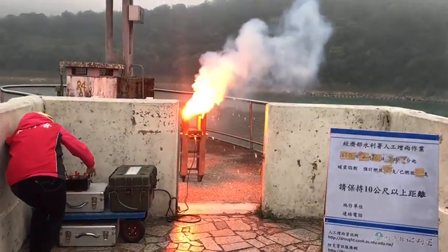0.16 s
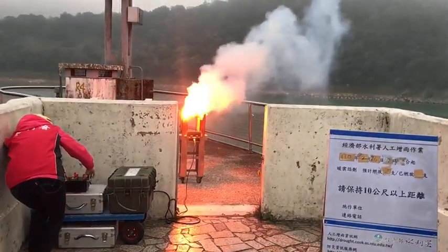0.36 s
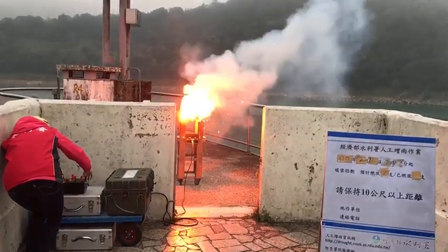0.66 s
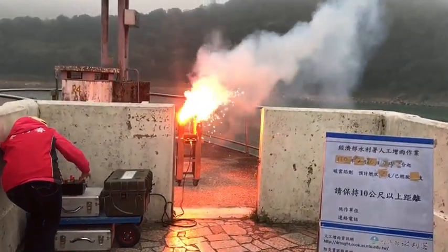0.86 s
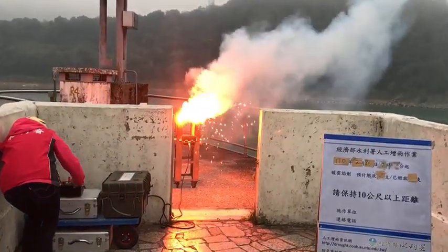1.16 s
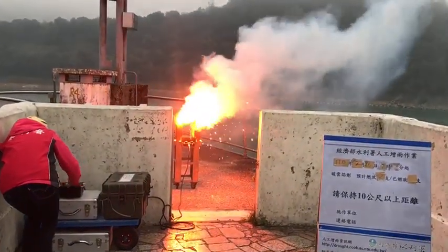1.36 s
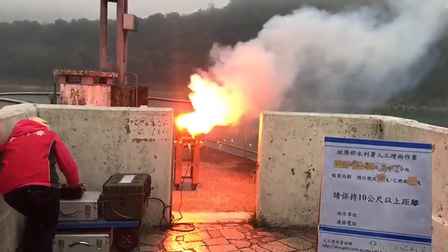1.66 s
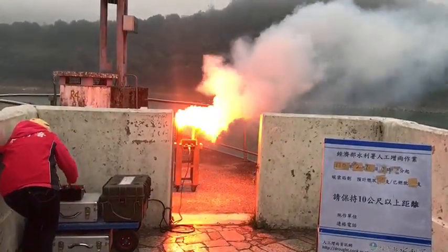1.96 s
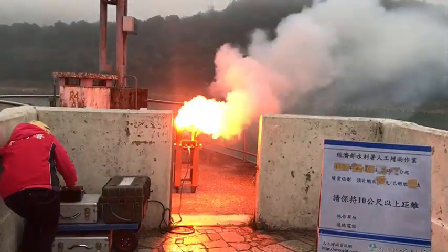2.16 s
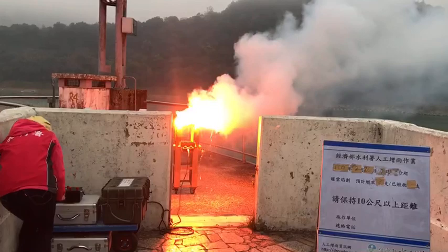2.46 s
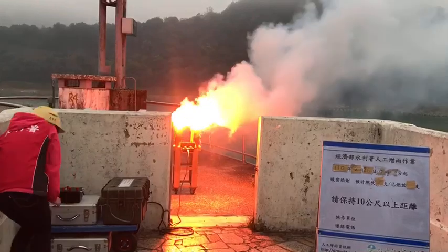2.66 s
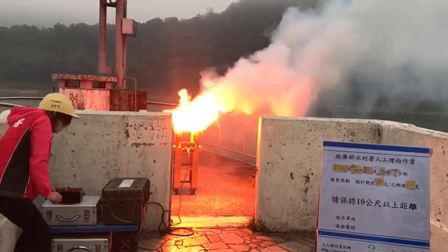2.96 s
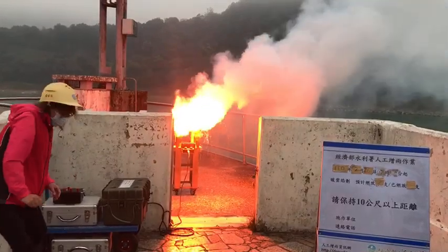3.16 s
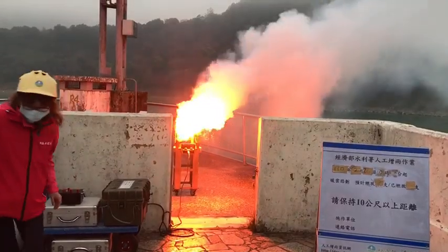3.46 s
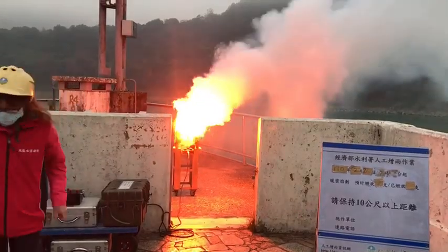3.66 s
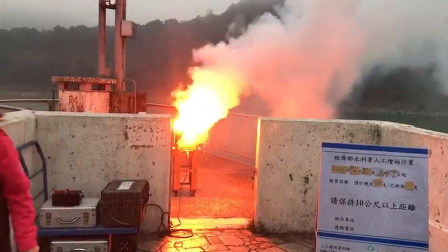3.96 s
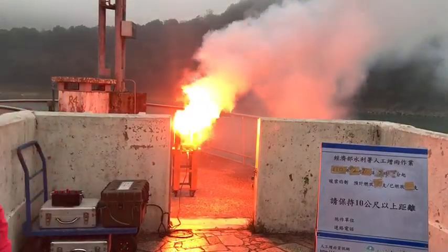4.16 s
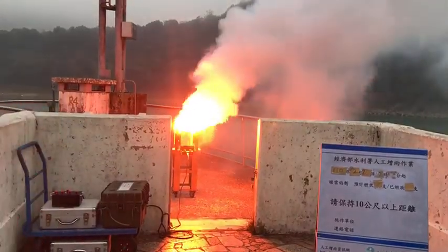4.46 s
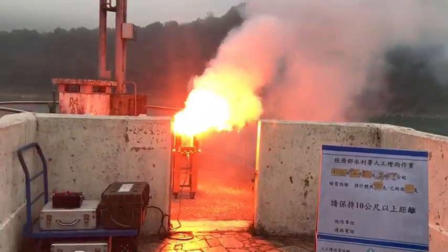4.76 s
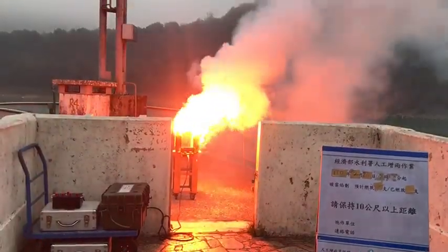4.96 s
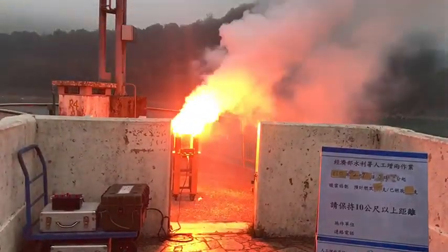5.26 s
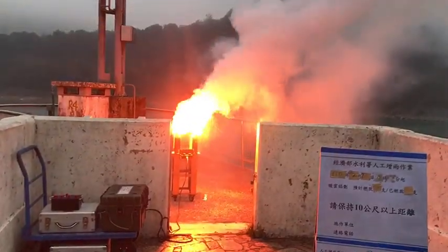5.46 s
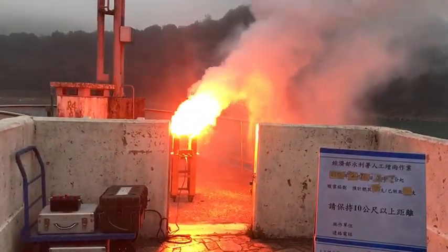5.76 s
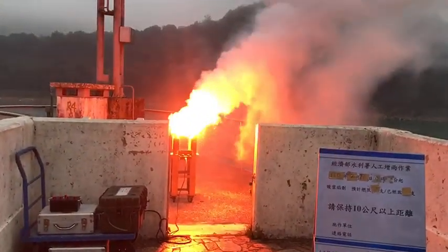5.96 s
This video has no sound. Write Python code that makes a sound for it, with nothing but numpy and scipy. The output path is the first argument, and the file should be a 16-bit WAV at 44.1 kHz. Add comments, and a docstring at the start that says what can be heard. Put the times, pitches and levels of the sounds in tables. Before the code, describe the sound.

A flare cracks sharply and pops a few times outdoors, then burns with a low roar and a hiss that grows brighter.

```python
"""A flare burns on a stand outdoors between concrete walls, straight ahead of the microphone, in mono.
The flame rumbles and roars; the gas jet spurts, chokes and hisses ever brighter. A second charge catches
with two ticks, a short squeal of escaping gas and a sharp crack; three clear pops and a faint one follow.
The crack drives the recorder's gain control down, so the burning drops away and returns in two steps."""
import sys
import numpy as np
from scipy import signal
from scipy.fft import rfft, irfft
from scipy.io import wavfile
from scipy.ndimage import uniform_filter1d, minimum_filter1d

SR = 44100
rng = np.random.default_rng(int(sys.argv[2]) if len(sys.argv) > 2 else 0)


def transcribe(u):
    """Save the signal u as a 16-bit wav file named by the first command-line argument.

    u: samples, shape (n,) or (channels, n), limited to [-1, 1]; the rate is SR.
    q: integer samples, one column per channel.
    """
    v = np.clip(np.atleast_2d(u).T, -1, 1)
    q = np.round(v * 32767).astype(np.int16)
    wavfile.write(sys.argv[1], SR, q)


N = 269451
TIME = np.arange(N) / SR


def gain_of(db):
    """Decibels to amplitude."""
    return 10 ** (np.asarray(db) / 20)


def unit_rms(x):
    """Scales to rms 1."""
    return x / np.sqrt(np.mean(x ** 2) + 1e-20)


def over_frequency(points, hz):
    """Reads rows of (freq_hz, value) on a log-frequency axis."""
    freq_hz, value = np.transpose(points)
    return np.interp(np.log(hz + 1), np.log(freq_hz + 1), value)


def over_time(rows, at=TIME):
    """Reads rows of (time_s, values...) as one curve for each value."""
    time_s, *columns = np.transpose(rows)
    return [np.interp(at, time_s, column) for column in columns]


def bump(hz, centre_hz, width_hz):
    """The outline of a resonance: height 1, halved at width_hz to either side."""
    return 1 / (1 + ((hz - centre_hz) / width_hz) ** 2)


def add(mix, start_s, sound):
    """Mixes a sound in at a time."""
    part = mix[round(start_s * SR):][:len(sound)]
    part += sound[:len(part)]


def wander(rate_hz):
    """Random drift of rms 1, mostly slower than rate_hz."""
    hz = np.fft.rfftfreq(N, 1 / SR)
    return unit_rms(irfft(rfft(rng.standard_normal(N)) / (1 + (hz / rate_hz) ** 2), N))


def turbulence(colour, patchy_db, lift=lambda at, hz: 0):
    """Coloured noise of rms 1 with drifting eddies; lift reshapes it in dB over time and frequency."""
    frames = dict(fs=SR, nperseg=2048, noverlap=1536)
    hz, at, noise = signal.stft(rng.standard_normal(N), **frames)
    eddies = uniform_filter1d(rng.standard_normal(noise.shape), size=16, axis=0)
    eddies = unit_rms(uniform_filter1d(eddies, size=6, axis=1))
    shape = gain_of(over_frequency(colour, hz)[:, None] + patchy_db * eddies + lift(at, hz[:, None]))
    _, flow = signal.istft(noise * shape / np.linalg.norm(shape, axis=0), **frames)
    return unit_rms(flow[:N])


def burst(colour, ring, ring_scale, hold_s, tilt_db_per_octave, lift=lambda hz: 0):
    """Dense scatter of a blast: level for a moment, then each band dies at its own speed."""
    t = TIME[:SR // 2]
    hz = np.fft.rfftfreq(len(t), 1 / SR)
    tilt_db = tilt_db_per_octave * np.log2((hz + 100) / 3000)
    shape = gain_of(over_frequency(colour, hz) + tilt_db + lift(hz))
    noise = irfft(shape * np.exp(2j * np.pi * rng.random(len(hz))), len(t))
    spectrum = rfft(unit_rms(noise))
    centres_hz, t60s = np.transpose(ring)
    out = np.zeros(len(t))
    for share, t60_s in zip(np.eye(len(ring)), t60s):
        band = irfft(spectrum * over_frequency(np.c_[centres_hz, share], hz), len(t))
        out += band * gain_of(-60 * np.maximum(t - hold_s, 0) / (t60_s * ring_scale))
    return out


def yard_echoes(x, t60_s=0.083, level_db=-12.5):
    """Many weak echoes from walls, cases and railings ripple the spectrum at the microphone."""
    t = TIME[:SR // 10]
    taps = rng.standard_normal(len(t)) * (t > .003) * gain_of(-60 * t / t60_s)
    return x + gain_of(level_db) * signal.oaconvolve(x, taps / np.linalg.norm(taps))[:N]


# Reflection off the ground between stand and microphone: freq_hz, echo_gain
GROUND_REFLECTION = [(100, 0.42), (400, 0.23), (1100, 0.11), (1900, 0.73), (2700, 0.3), (4000, 0.037),
                     (6500, 0.28), (10000, .08)]
def ground_echo(x, delay_s=0.001344, sway_share=.024):
    """A path about half a metre longer combs the sound; the flame flickers about, so the comb phases."""
    echo = irfft(rfft(x) * over_frequency(GROUND_REFLECTION, np.fft.rfftfreq(N, 1 / SR)), N)
    swaying_s = delay_s * (1 + sway_share * wander(rate_hz=3.5))
    return x + np.interp(TIME - swaying_s, TIME, echo)


# Thumps of gas at the stand: centre_s, level_db, pitch_hz, half_length_cycles
GAS_THUMPS = [(.520, 3.5, 59, 0.71), (1.126, -29, 335, 2.7), (1.593, -30, 176, 1.3),
              (2.111, -24.5, 150, .6), (2.130, -28, 140, 0.53)]
def thumps():
    """The larger blasts push out gas, each in one short, low pulse."""
    out = np.zeros(N)
    for centre_s, level_db, pitch_hz, half_length_cycles in GAS_THUMPS:
        cycles = (TIME - centre_s) * pitch_hz
        envelope = np.exp(-(cycles / half_length_cycles) ** 2)
        out += gain_of(level_db) * np.cos(2 * np.pi * cycles) * envelope
    return out


# Ticks and pops of the charge: start_s, level_db, ring_scale, tilt_db_per_octave, peak_hz, peak_db
CHARGE_POPS = [(0.4212, -19.5, 0.13, -4, 5800, 11), (0.479, -21, 0.17, -5.5, 2200, 5),
               (1.114, -16.5, 0.98, -0.5, 3900, 5), (1.338, -27.5, 0.33, -3, 6000, 2),
               (1.5705, -16, 0.96, 0.3, 3500, 0), (2.092, -15.5, 0.79, 0.5, 2700, 11)]
# Spectrum of a pop before its tilt and peak: freq_hz, density_db
POP_SPECTRUM = [(60, -32), (200, -7.5), (400, -6.5), (900, 1.5), (1700, 3.5), (3000, -1.5), (4500, 0.5),
                (6500, -0.5), (10000, -2), (15500, -11.5)]
# Decay of a pop at ring_scale 1: freq_hz, t60_s
POP_DECAY = [(150, 0.31), (1000, 0.075), (4000, 0.12), (8000, 0.051), (15000, 0.084)]
def pops():
    """Small blasts scattered by the stand and walls; a longer pop also holds its level longer."""
    out = np.zeros(N)
    for start_s, level_db, ring_scale, tilt, peak_hz, peak_db in CHARGE_POPS:
        pop = burst(POP_SPECTRUM, POP_DECAY, ring_scale, hold_s=0.0013 * ring_scale ** 2,
                    tilt_db_per_octave=tilt, lift=lambda hz: peak_db * bump(hz, peak_hz, 0.13 * peak_hz))
        add(out, start_s, gain_of(level_db) * pop)
    return out


# Two tones of gas at the failing seal: time_s, upper_hz, upper_db, lower_hz, lower_db
SEAL_TONES = [(.480, 3000, -37, 1980, -53), (.486, 3000, -24, 2030, -25), (.489, 2940, -23, 2170, -24),
              (0.492, 3020, -26, 2260, -13), (.497, 2980, -9.5, 2460, -20), (0.502, 3020, -14, 2570, -40)]
# Dull rush through the seal: freq_hz, density_db
LEAK_SPECTRUM = [(40, -3), (300, -8), (1100, 3), (2000, -21), (8000, -26)]
def squeal():
    """Gas forces the seal: two unsteady tones swell and draw together just before the crack."""
    upper_hz, upper_db, lower_hz, lower_db = over_time(SEAL_TONES)
    waver = 1 + .012 * wander(rate_hz=280)
    upper, lower = (2 * np.pi * np.cumsum(hz * waver) / SR for hz in (upper_hz, lower_hz))
    overtones = gain_of(-19) * np.sin(2 * lower) + gain_of(-20) * np.sin(3 * lower)
    tones = gain_of(upper_db) * np.sin(upper) + gain_of(lower_db) * (np.sin(lower) + overtones)
    leak = gain_of(lower_db - 8.5) * turbulence(LEAK_SPECTRUM, patchy_db=0)
    return (tones + leak) * (TIME > SEAL_TONES[0][0]) * (TIME < SEAL_TONES[-1][0])


# Spectrum of the crack before its tilt: freq_hz, density_db
CRACK_SPECTRUM = [(18, -38), (30, -11), (412, -9.5), (495, -13), (594, -8.5), (752, -12.5), (835, -8.5),
                  (1210, -3), (1880, -15.5), (3620, -12), (4960, -24.5), (6110, -19), (7540, -26),
                  (8820, -28), (15700, -29.5)]
# Decay of the crack at ring_scale 1: freq_hz, t60_s
CRACK_DECAY = [(60, 0.19), (300, 0.29), (1000, 0.23), (2500, 0.12), (6000, 0.17), (15000, 0.16)]
# Modes of the flare tube, rung by the crack: pitch_hz, relative_db, t60_s
TUBE_MODES = [(228, -27, 0.31), (328, -29, 0.37), (583, -17.5, 0.06), (850, -13.5, 0.15), (987, -15, 0.21),
              (1090, -33, 0.15), (1150, -28, 0.11), (1244, -7, 0.099), (1480, -13.5, 0.14)]
# Dull echoes off the concrete, on paths 19 to 35 m longer than the direct one: delay_s, relative_db
WALL_ECHOES = [(0.055, -31), (.08, -21), (.102, -27)]
def crack(start_s=.5012, blast_db=9, shock_s=0.00023, nearest_echo_s=.0115):
    """The charge bursts its seal: shock wave, ringing tube and a dense scatter the walls throw back."""
    t, out = TIME[:SR // 2], np.zeros(N)
    shock = (1 - t / shock_s) * np.exp(-t / shock_s)
    tube = sum(gain_of(db - 60 * t / t60_s) * np.sin(2 * np.pi * (hz * t + rng.random()))
               for hz, db, t60_s in TUBE_MODES)
    scatter = burst(CRACK_SPECTRUM, CRACK_DECAY, ring_scale=0.88, hold_s=0.009, tilt_db_per_octave=2.0)
    bounce = burst(CRACK_SPECTRUM, CRACK_DECAY, ring_scale=0.74, hold_s=0.0045, tilt_db_per_octave=0.2)
    add(out, start_s, scatter + gain_of(10) * shock + gain_of(10.5) * tube)
    add(out, start_s + nearest_echo_s, gain_of(2) * bounce)
    dull = signal.sosfilt(signal.butter(1, 2000, fs=SR, output="sos"), scatter)
    for delay_s, relative_db in WALL_ECHOES:
        add(out, start_s + delay_s, gain_of(relative_db) * dull)
    # a faint bright wash lingers over the yard
    wash = burst(CRACK_SPECTRUM, CRACK_DECAY, ring_scale=3.4, hold_s=0.033, tilt_db_per_octave=2.5)
    add(out, start_s, gain_of(-28.5) * wash)
    return gain_of(blast_db) * out


def sparks(per_s=180, spread_db=4):
    """Burning grains spit tiny clicks of slightly uneven strength."""
    clicks = (rng.random(N) < per_s / SR) * gain_of(-np.minimum(rng.exponential(1, N), spread_db))
    band = signal.butter(2, [2000, 11000], "band", fs=SR, output="sos")
    return unit_rms(signal.sosfilt(band, clicks))


# Slow course of the gas jet: time_s, rush_db, fizz_db
JET_COURSE = [(0, -42, -47.5), (.45, -40.5, -46), (1.18, -40.5, -49.5), (1.35, -34, -50.5),
              (1.55, -34.5, -46.5), (1.68, -39.5, -48), (2.22, -37, -38.5), (2.88, -36.5, -39.5),
              (3.04, -40.5, -41), (3.3, -38.5, -41), (3.66, -38, -38), (3.79, -33, -34.5),
              (3.98, -34, -35.5), (4.45, -34, -36.5), (4.82, -36, -39.5), (5.06, -34.5, -34.5),
              (6.1, -35, -35)]
# Brief spurts (+) and chokes (-) on top of it: centre_s, half_length_s, rush_db, hiss_db, fizz_db
JET_SPURTS = [(.435, 0.02, 1.5, 12, 4), (1.425, .025, 1, 6, -1), (2.903, 0.038, 2.5, 1, 3),
              (3.47, 0.048, 2.5, 4, 5.5), (3.69, 0.03, -2.5, 3.5, -4), (4.31, .045, -1.5, -3.5, -5),
              (4.543, .04, -1, -3, -1.5), (4.644, 0.043, 0.5, 3.5, 3), (4.725, 0.034, 2, 2, 3.5),
              (4.923, .028, 2.5, 6.5, 4), (4.983, 0.012, -2, -6, -1), (5.382, 0.05, 0, -5, -1),
              (5.967, 0.028, -1.5, -11.5, -7), (6.044, 0.037, -1, -7.5, -7.5)]
def jet_levels(harsh_s=4.83, harsh_rise_s=0.085, harsh_db=8):
    """Rush, hiss and fizz of the jet in dB; the hiss follows the other two and turns harsh late on."""
    rush_db, fizz_db = over_time(JET_COURSE)
    hiss_db = -49 + 0.85 * (rush_db - rush_db.mean()) + 0.34 * (fizz_db - fizz_db.mean())
    hiss_db += harsh_db * .5 * (1 + np.tanh((TIME - harsh_s) / harsh_rise_s))
    spurts_db = sum(np.outer(change_db, np.exp(-((TIME - centre_s) / half_length_s) ** 2))
                    for centre_s, half_length_s, *change_db in JET_SPURTS)
    return np.array([rush_db, hiss_db, fizz_db]) + spurts_db


# The jet's three bands, low to high: freq_hz, density_db
RUSH_SPECTRUM = [(1300, -14), (1850, -3.5), (2200, -2), (2600, -1), (3000, -1), (3250, -5), (3650, -6),
                 (3950, -12), (5500, -25)]
HISS_SPECTRUM = [(3000, -35), (4000, -2), (5000, -1), (6000, 1), (7000, 1.5), (7800, -6.5), (8600, -7.5),
                 (11000, -32)]
FIZZ_SPECTRUM = [(6500, -18.5), (8200, -5.5), (9200, -4), (10500, -6.5), (11400, 0), (14000, 1.5),
                 (15700, -3)]
# Airy resonance of the nozzle, dipping, then climbing as the burn grows: time_s, pitch_hz, height_db
NOZZLE_RESONANCE = [(0, 2570, 8), (1.3, 1970, 5), (2, 2290, 6.5), (2.5, 2600, 6.5), (2.9, 2800, 4.5),
                    (3.25, 2500, 4), (3.5, 2800, 6.5), (3.85, 3130, 7.5), (4.3, 3230, 9.5),
                    (4.7, 3100, 9.5), (5.1, 3120, 3.5), (6.1, 3070, 0)]
def gas_jet(rush_db, hiss_db, fizz_db, flutter):
    """Turbulent gas leaves the resonant nozzle as a rush, a hiss and a fine fizz."""
    def whistle(at, hz):
        pitch_hz, height_db = over_time(NOZZLE_RESONANCE, at)
        return height_db * bump(hz, pitch_hz, width_hz=480)

    def upper_partial(at, hz):  # a narrow peak in a trough, clearer the more the nozzle whistles
        pitch_hz, height_db = over_time(NOZZLE_RESONANCE, at)
        peak = bump(hz, 1.65 * pitch_hz, width_hz=120)
        trough = bump(hz, 1.59 * pitch_hz, width_hz=420)
        return 0.86 * height_db * (peak - trough)

    def hollow(at, hz):  # a weak jet gathers its fizz in one band
        weakness_db = fizz_db.max() - np.interp(at, TIME, fizz_db)
        return 0.44 * weakness_db * bump(hz, centre_hz=9500, width_hz=310)

    rush = gain_of(rush_db + 0.3 * flutter) * turbulence(RUSH_SPECTRUM, patchy_db=0.87, lift=whistle)
    hiss = gain_of(hiss_db + 0.6 * flutter) * turbulence(HISS_SPECTRUM, patchy_db=2, lift=upper_partial)
    fizz = gain_of(fizz_db + 1.26 * flutter) * turbulence(FIZZ_SPECTRUM, patchy_db=1.2, lift=hollow)
    return rush + hiss + fizz


# The flame's two bands, low to high: freq_hz, density_db
RUMBLE_SPECTRUM = [(20, -40), (35, -16), (55, 9), (85, 2.5), (120, -0.5), (160, -0.5), (205, 3), (330, -4),
                   (420, -12.5), (600, -28)]
ROAR_SPECTRUM = [(250, -20), (400, -9.5), (550, 4.5), (780, -0.5), (1000, -7), (1250, -3), (1600, -4),
                 (1900, 3), (2500, -59)]
# Strength of the flame, which flares up once and settles: time_s, roar_db
FLAME_COURSE = [(0, -37.5), (.35, -41), (1.17, -38.5), (1.35, -34), (1.48, -32.7), (1.7, -36.3),
                (2.68, -37.5), (3.27, -42.5), (3.8, -40), (4.7, -41), (5.1, -44), (6.1, -44)]
def flame(hiss_db, flutter, calm_db=-43.5):
    """The flame roars over a deep rumble that swells and sinks in one broad arch."""
    roar_db, = over_time(FLAME_COURSE)
    rumble_db = -41 - 0.48 * (TIME - 3.06) ** 2

    def strength_db(at):
        return np.interp(at, TIME, roar_db) - calm_db

    def depth(at, hz):  # a stronger flame thins the deepest rumble
        return -0.79 * strength_db(at) * bump(hz, centre_hz=55, width_hz=49)

    def body(at, hz):  # a stronger flame fills the middle of the roar; a harder hiss thins its low end
        hardness_db = np.interp(at, TIME, hiss_db) - hiss_db.mean()
        fill_db = 0.86 * strength_db(at) * bump(hz, centre_hz=1115, width_hz=330)
        return fill_db - 0.091 * hardness_db * bump(hz, centre_hz=714, width_hz=730)

    rumble = gain_of(rumble_db + flutter) * turbulence(RUMBLE_SPECTRUM, patchy_db=0.5, lift=depth)
    roar = gain_of(roar_db + 0.02 * flutter) * turbulence(ROAR_SPECTRUM, patchy_db=0, lift=body)
    return rumble + roar


def burning_flare():
    """Flame and gas jet shake with one flutter; the sparks follow the level of the hiss."""
    rush_db, hiss_db, fizz_db = jet_levels()
    flutter = wander(rate_hz=21)
    burn = flame(hiss_db, flutter) + gas_jet(rush_db, hiss_db, fizz_db, flutter)
    return burn + gain_of(hiss_db - 14.5) * sparks()


def scene():
    """The flare stands in the yard straight ahead of the microphone, alike in both channels."""
    burn = yard_echoes(ground_echo(burning_flare()))
    mono = burn + pops() + thumps() + squeal() + crack()
    return np.array([mono, mono])


def peak_hold(over_db, hold_s, recover_db_per_s):
    """Keeps each peak for a hold time, then lets it fall at a steady rate."""
    half = max(round(hold_s * SR / 2), 1)
    peak_db = -minimum_filter1d(-over_db, size=2 * half + 1, origin=half, mode="constant")
    fall_db = recover_db_per_s * TIME
    return np.maximum.accumulate(peak_db + fall_db) - fall_db


def record(dry, low_cut_hz=34, limit_db=-11.5, overload=.85, high_cut_hz=15680):
    """The recorder: low cut, a quick limiter and a slower gain control, then overload and band limit."""
    dry = signal.sosfilt(signal.butter(4, low_cut_hz, "high", fs=SR, output="sos"), dry)
    power = abs(uniform_filter1d(dry[0] ** 2, size=301, origin=130))
    over_db = np.maximum(10 * np.log10(power + 1e-12) - limit_db, 0)
    quick_db = peak_hold(over_db, hold_s=0.16, recover_db_per_s=298)
    slow_db = peak_hold(0.34 * over_db, hold_s=0.36, recover_db_per_s=24.48)
    duck_db = uniform_filter1d(np.maximum(quick_db, slow_db), size=30)
    clipped = np.clip(dry / gain_of(duck_db), -overload, overload)
    band_limit = signal.firwin(511, high_cut_hz, window=("kaiser", 9), fs=SR)
    return signal.oaconvolve(clipped, band_limit[None], "same")


dry = scene()
out = record(dry)
transcribe(out)
```